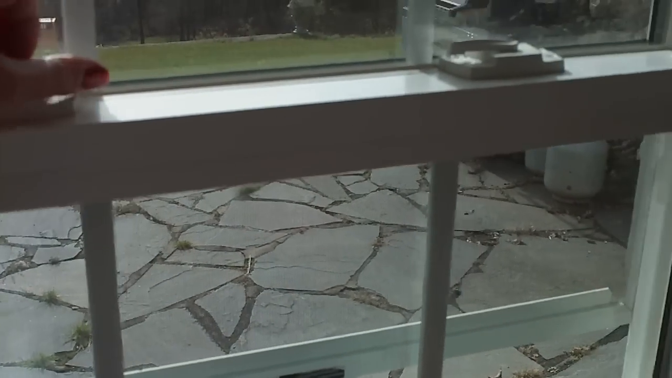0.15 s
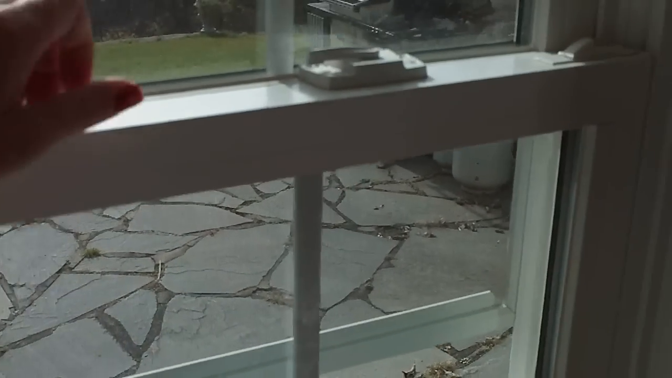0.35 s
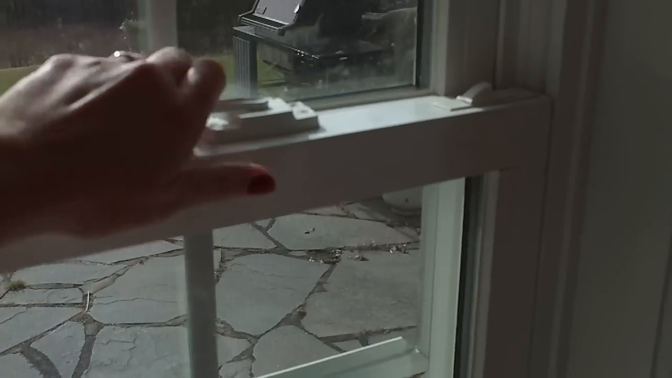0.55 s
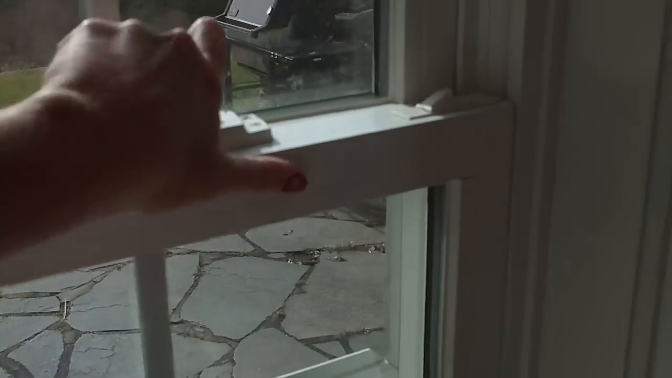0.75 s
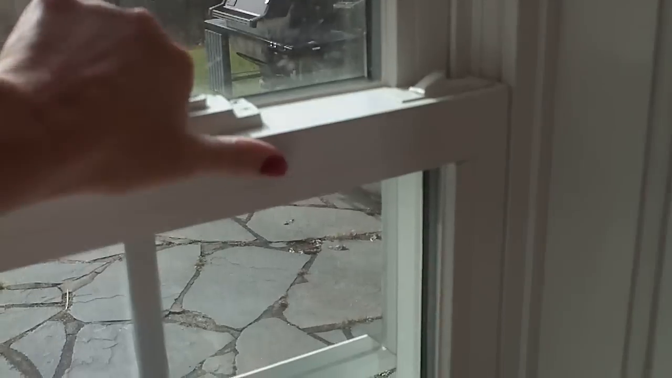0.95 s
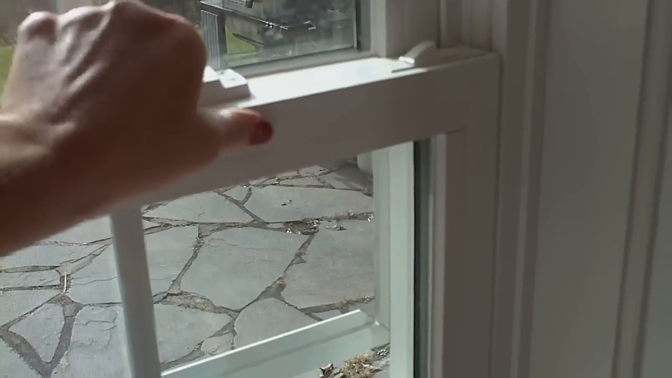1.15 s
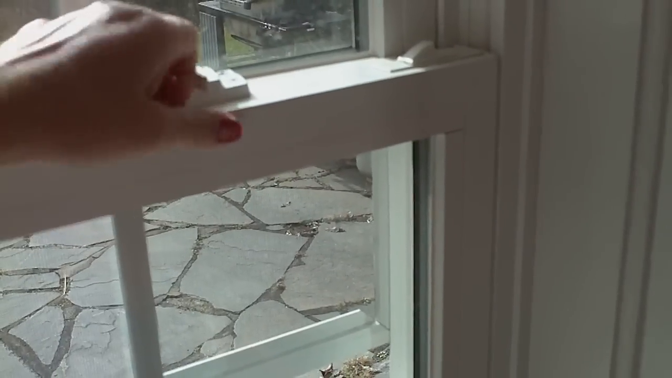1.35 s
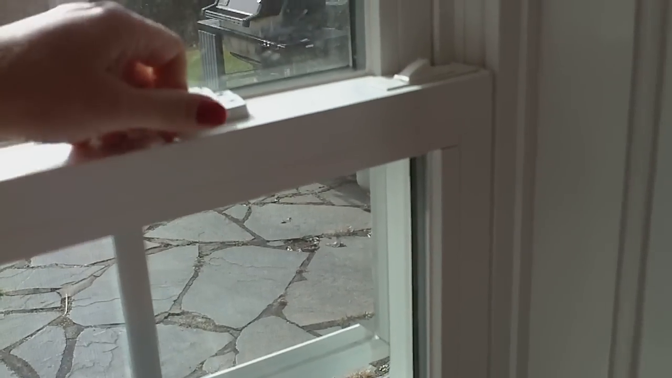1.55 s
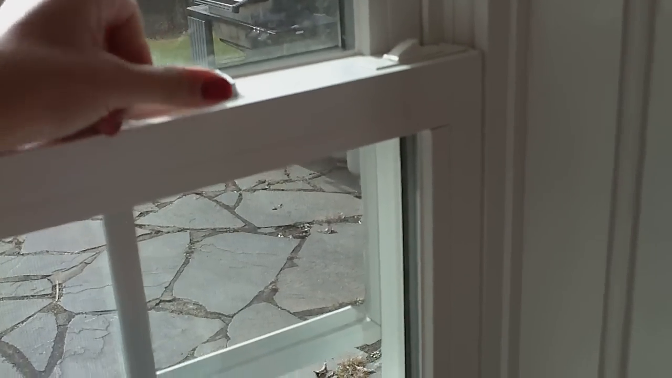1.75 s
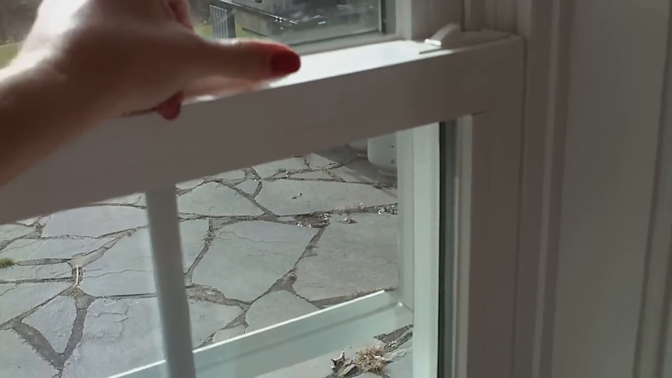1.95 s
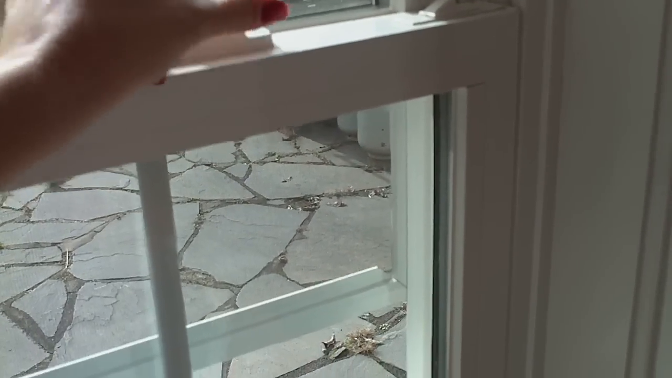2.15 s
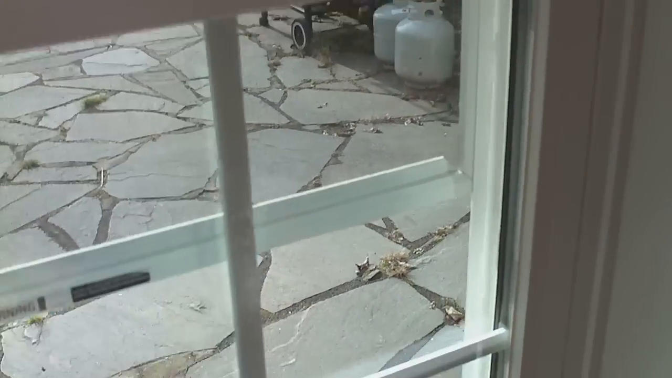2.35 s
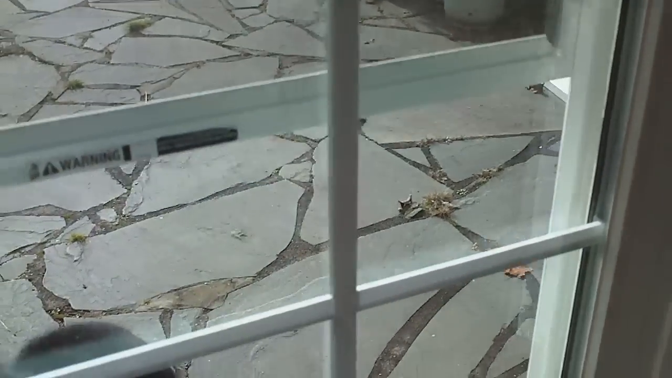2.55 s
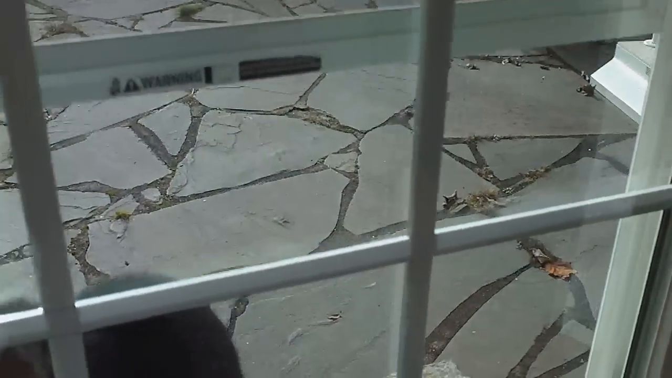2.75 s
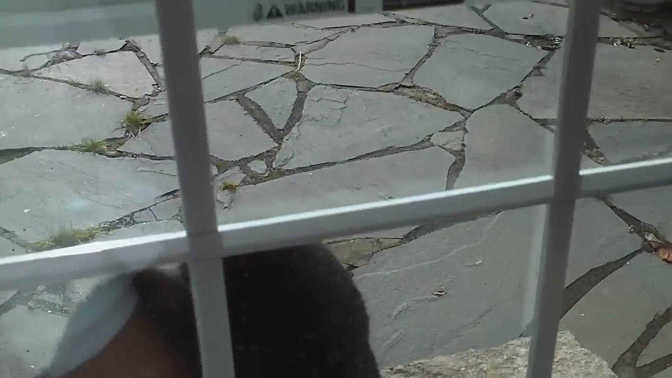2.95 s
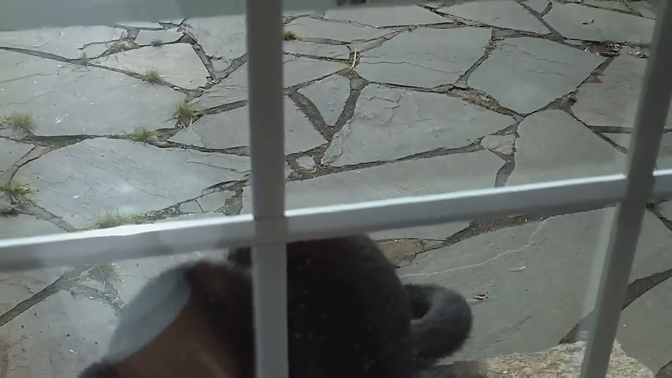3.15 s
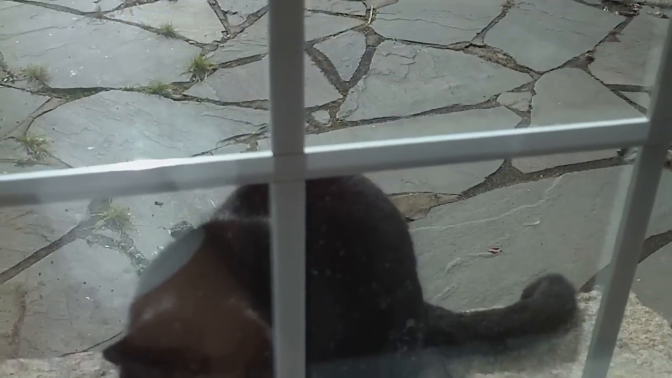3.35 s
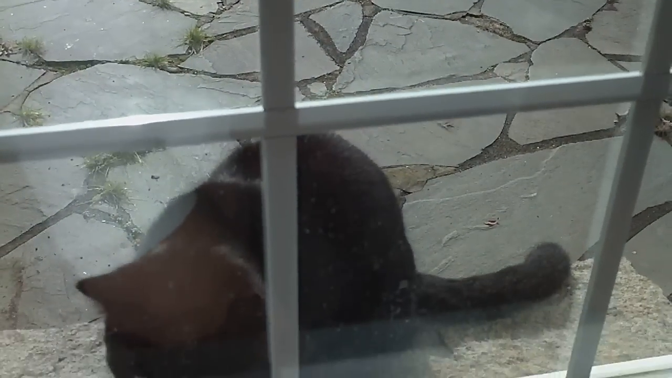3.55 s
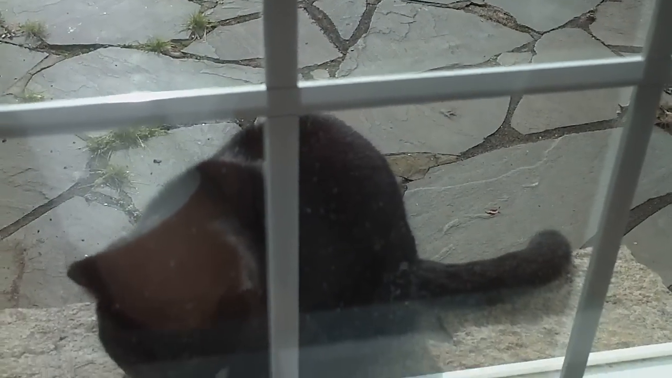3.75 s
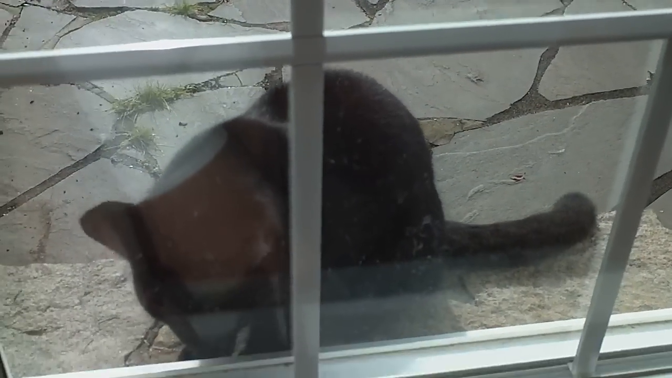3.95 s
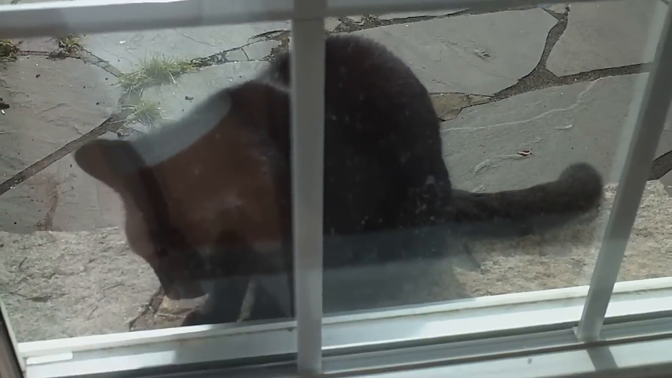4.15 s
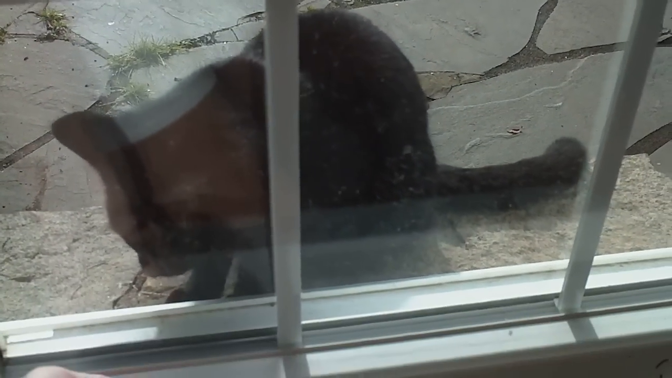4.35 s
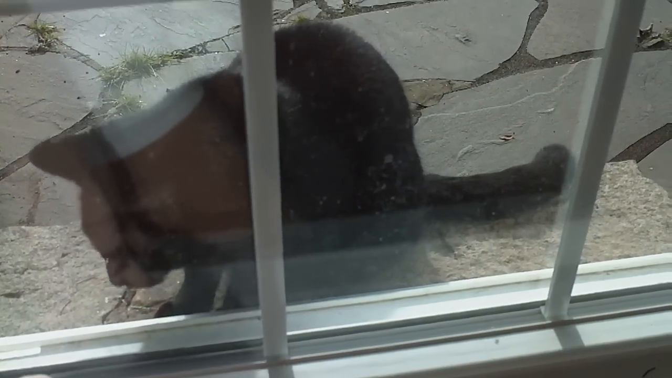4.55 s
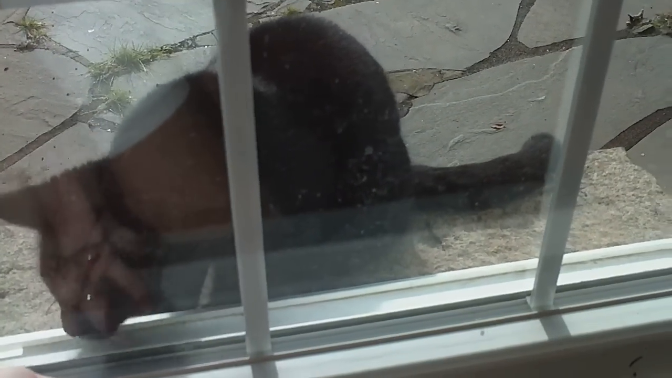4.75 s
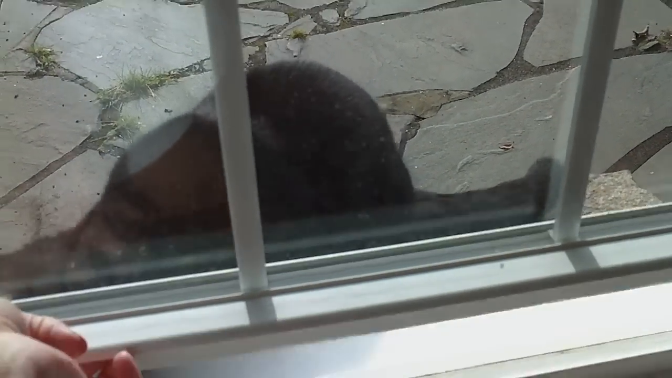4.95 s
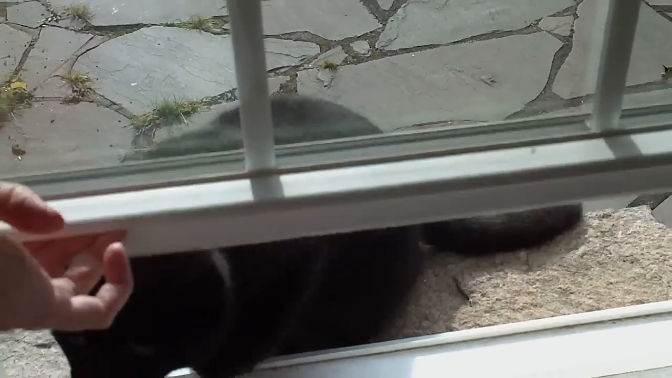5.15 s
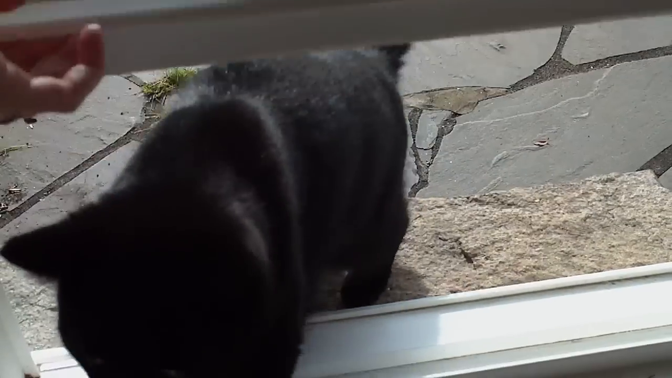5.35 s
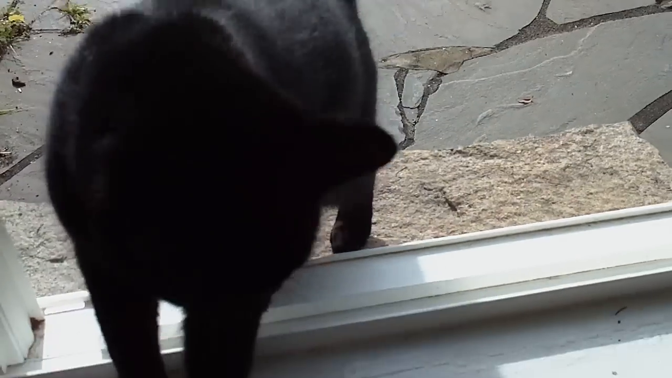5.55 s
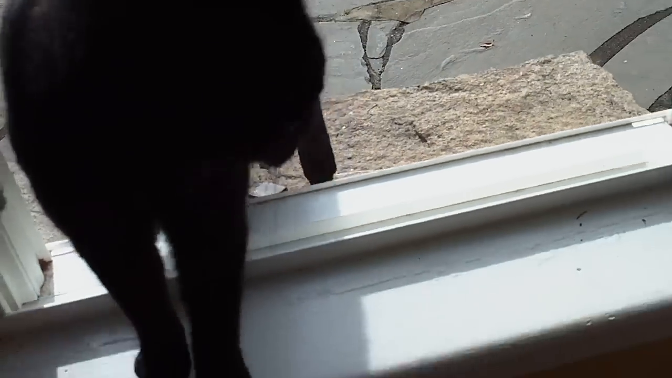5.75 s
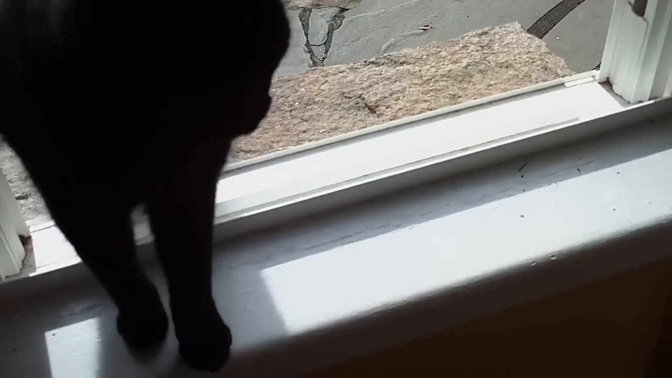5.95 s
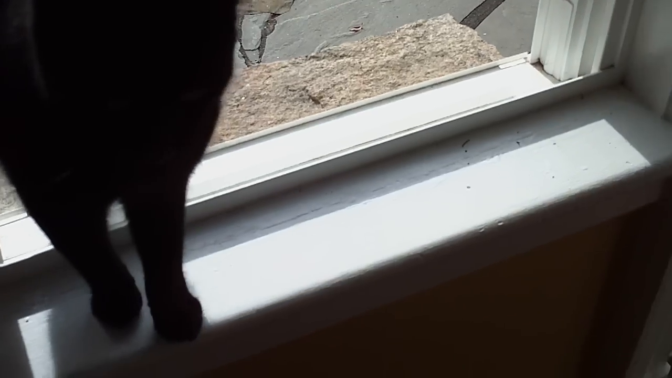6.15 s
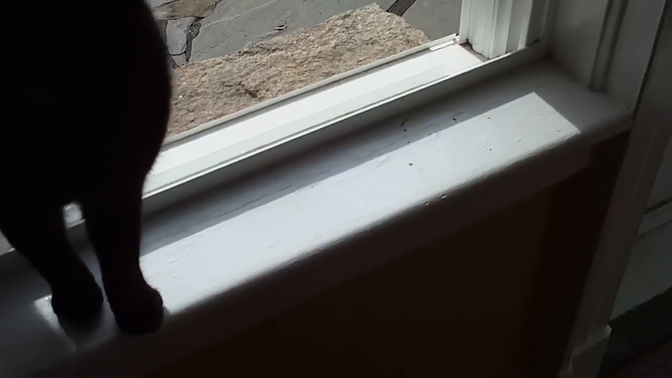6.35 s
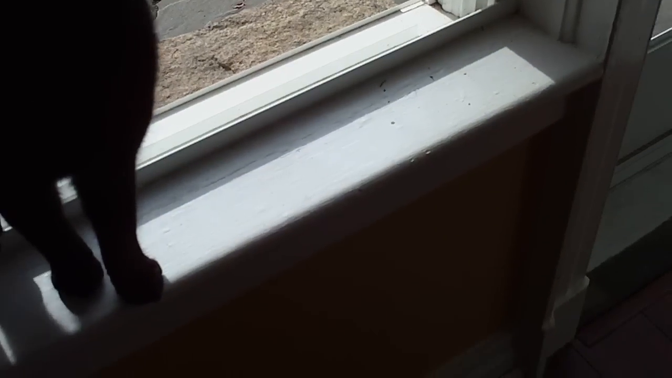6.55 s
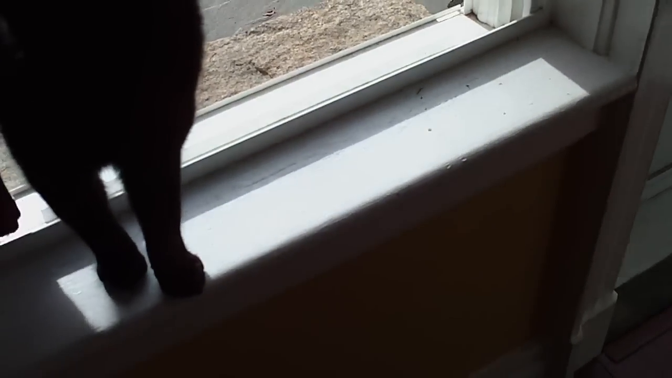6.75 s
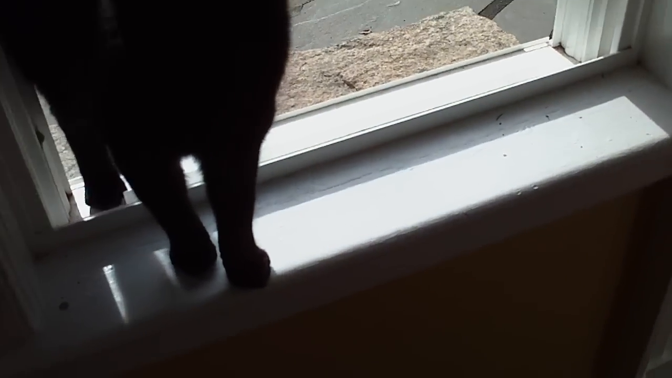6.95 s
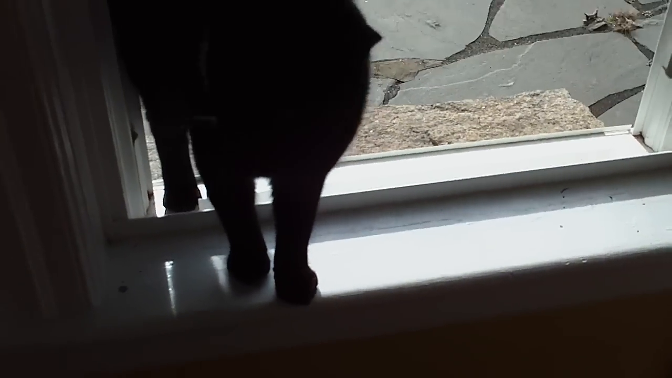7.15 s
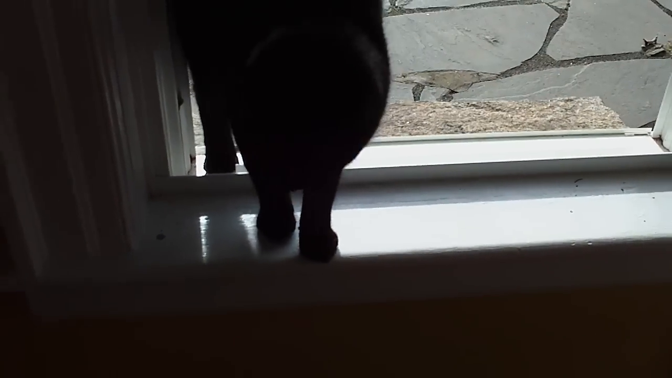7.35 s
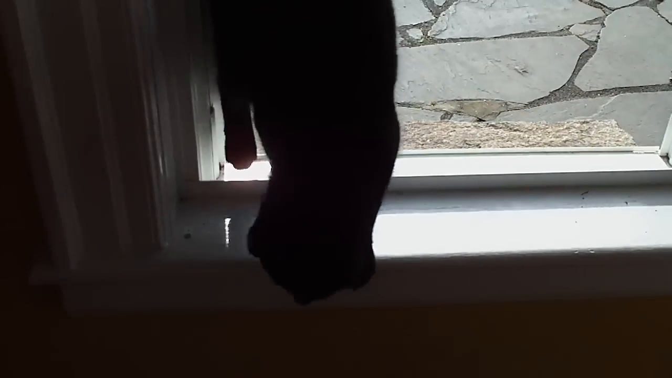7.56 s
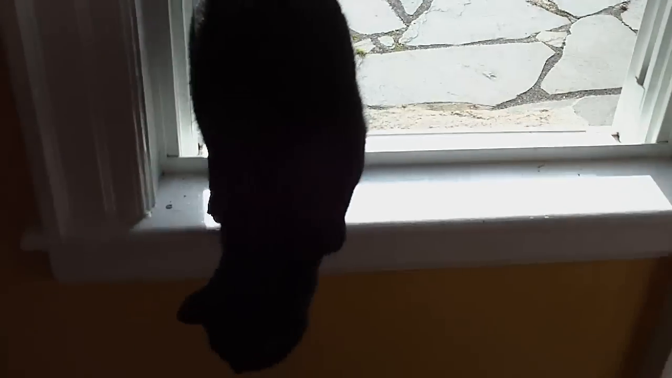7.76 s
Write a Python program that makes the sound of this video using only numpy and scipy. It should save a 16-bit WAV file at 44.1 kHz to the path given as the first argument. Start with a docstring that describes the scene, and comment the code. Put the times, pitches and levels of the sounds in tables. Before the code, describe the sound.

A window latch snaps sharply, the frame is knocked, then a stuck sash jerks free with loud cracks and slides up over a faint drone.

```python
"""In a small hard room, a hand snaps a window latch, bumps the frame, then jerks the stuck sash free and slides it up.
A cat brushes in over the sill. Blows are gritty bursts plus ringing modes; rubbing is a stream of tiny random slips.
The room echoes the hard blows and the rubbing, and pushes make the pane hum low. A far propeller drone, made of sine
partials, sinks slowly in pitch and comes in more clearly. A hissy microphone clips the peaks and cuts the top treble."""
import sys
import numpy as np
from scipy import signal
from scipy.fft import rfft, irfft
from scipy.io import wavfile
from scipy.ndimage import uniform_filter1d

SR = 44100
rng = np.random.default_rng(int(sys.argv[2]) if len(sys.argv) > 2 else 0)


def output_pcm(signal):
    """Save a mono or channel-first signal as 16-bit PCM at the path in sys.argv[1].

    Samples are clipped to [-1, 1] before scaling.
    """
    pcm = np.clip(np.atleast_2d(signal).T, -1, 1) * 32767
    wavfile.write(sys.argv[1], SR, np.round(pcm).astype(np.int16))


N = 343980
T = np.arange(N) / SR  # time in the scene, s
ONE_SECOND = np.arange(SR) / SR  # time within one ring or echo, s


def undb(db):
    """Turn decibels into a gain."""
    return 10 ** (np.asarray(db) / 20)


def unit(x):
    """Scale a sound to an rms of 1."""
    return x / np.sqrt(np.mean(x ** 2))


def level_curve(table):
    """Join (start_s, level_db) points by straight lines and return the gain over time."""
    start_s, level_db = np.transpose(table)
    return undb(np.interp(T, start_s, level_db))


def add(out, start_s, sound):
    """Mix a sound in at its start time."""
    start = max(int(start_s * SR), 0)
    out[start:start + len(sound)] += sound[:N - start]


def at_hz(points, hz):
    """Read (pitch_hz, value) points at any pitch, on a log-frequency axis."""
    knots, values = np.transpose(points)
    return np.interp(np.log(hz), np.log(knots), values)


def colour(x, points):
    """Shape the spectrum by (pitch_hz, level_db) points, then scale to an rms of 1."""
    hz = np.maximum(np.fft.rfftfreq(len(x), 1 / SR), 1)
    return unit(irfft(rfft(x) * undb(at_hz(points, hz)), len(x)))


def walk(rate):
    """Smooth random drift with an rms of 1, taking a new direction rate times a second."""
    step = int(SR / rate)
    stairs = np.repeat(rng.standard_normal(N // step + 1), step)
    return unit(uniform_filter1d(stairs, step)[:N])


def dying(t60):
    """Exponential fade that drops by 60 dB in t60 seconds."""
    return np.exp(-np.log(1000) * ONE_SECOND / t60)


# Echoes of the room, band by band: (pitch_hz, t60_s to fade by 60 dB, level_db of the echo)
ROOM = [(80, 0.46, -3.5), (200, 0.43, -6.5), (450, 0.4, -0.5), (1000, 0.56, -2), (2000, 0.52, -4.5),
        (3600, 0.56, -4.5), (5700, 0.48, -3), (7170, 0.22, -13.5)]


def room(x, gap_s=0.0024, fill_s=0.03, first_density=0.039):
    """A few early reflections thicken into a diffuse tail that dies at its own rate in each band."""
    density = first_density + (1 - first_density) * (1 - np.exp(-(ONE_SECOND / fill_s) ** 2))
    reflections = rng.standard_normal(SR) * (rng.random(SR) < density) / np.sqrt(density)
    echoes = rfft(reflections)
    log_hz = np.log(np.maximum(np.arange(len(echoes)), 1))  # one second long, so the bins are 1 Hz apart
    log_centres = np.log(np.array(ROOM)[:, 0])
    onset = 1 - np.exp(-(ONE_SECOND / gap_s) ** 2)
    response = np.zeros(SR)
    for share, (_, t60, level_db) in zip(np.eye(len(ROOM)), ROOM):
        fade = onset * dying(t60)
        band = irfft(echoes * np.interp(log_hz, log_centres, share), SR)
        response += undb(level_db) * band * fade / np.linalg.norm(fade)
    return signal.fftconvolve(x, response)[:N]


def ring(hz, t60, rise_ms):
    """One mode builds up, then dies away; no two blows tune it quite alike."""
    turns = hz * (1 + 0.0032 * rng.standard_normal()) * ONE_SECOND + rng.random()
    build_up = 1 - np.exp(-ONE_SECOND * 1000 / rise_ms)
    return build_up * dying(t60) * np.sin(2 * np.pi * turns)


def body(modes, hz, width, lift_db):
    """A struck part radiates best around its modes; the gain has an rms of 1 from 300 to 2500 Hz."""
    ridges = np.ones(len(hz))
    for mode_hz, level_db, _ in modes:
        ridges += undb(level_db + lift_db) / (1 + ((hz / mode_hz - 1) / width) ** 2)
    middle = (hz > 300) & (hz < 2500)
    return ridges / np.sqrt(np.mean(ridges[middle] ** 2))


# How much of a blow's extra thud reaches each pitch: (pitch_hz, share from 0 to 1)
THUD_SHARE = [(130, 1), (430, 0.2644), (1000, 0)]
# How much of a blow's extra brightness reaches each pitch: (pitch_hz, share from 0 to 1)
BRIGHT_SHARE = [(1000, 0), (1900, 0.49), (3400, 1), (5700, 0.72)]


def blows(table, modes, tone, ring_db, crack_db, grit, lift_db, width=0.058, even=0.66, top_db=-7):
    """Each blow is a brief gritty chatter of contact that echoes, and the ring of the part that was struck."""
    cracks, rings = np.zeros(N), np.zeros(N)
    size, grain = 4096, 32  # samples
    ms = ONE_SECOND[:size] * 1000
    f = np.maximum(np.fft.rfftfreq(size, 1 / SR), 1)
    slope_db = np.interp(f, [0, 90, 6000, 7300], [-20, 0, 2.5, top_db])
    radiated = body(modes, f, width, lift_db) * undb(crack_db + slope_db)
    for start_s, contact_ms, level_db, thud_db, bright_db in table:
        def gain(hz):
            """Strength of this blow at a pitch: weight lifts the bass, a hard contact the treble."""
            thud = thud_db * at_hz(THUD_SHARE, hz)
            bright = bright_db * at_hz(BRIGHT_SHARE, hz)
            return undb(level_db + at_hz(tone, hz) + thud + bright)

        age = ms / contact_ms
        push = age * np.exp(-age)  # strongest at contact_ms
        grains = np.repeat(np.exp(grit * rng.standard_normal(size // grain)), grain)
        force = rfft(push * grains * rng.standard_normal(size))
        force /= np.abs(force) ** min(even, 1)  # hard contact spreads its energy more evenly
        force /= np.sqrt(np.mean(np.abs(force) ** 2))
        add(cracks, start_s, irfft(force * gain(f) * radiated)[:size // 2])
        for hz, mode_db, t60 in modes:
            add(rings, start_s, gain(hz) * undb(mode_db + ring_db) * ring(hz, t60, 2 * contact_ms))
    return cracks + room(cracks) + rings


# Tone of the microphone hiss and quiet room: (pitch_hz, level_db)
FLOOR_COLOUR = [(60, 0), (150, -1), (280, 3), (450, 3.5), (700, -2), (1000, -3), (1500, -4.5), (2400, -6),
                (3200, -6.5), (4400, -7), (5700, -6.5), (6600, -9), (7400, -22)]
# Its level as the window opens: (start_s, level_db)
FLOOR_LEVEL = [(0, -49.5), (2.5, -49.5), (4.4, -50.5), (5.8, -47), (6.6, -49.5), (7.8, -48.5)]
# Tone of the low house rumble: (pitch_hz, level_db)
RUMBLE_COLOUR = [(15, 4), (32, 3.5), (55, -11), (100, 1.5), (200, -19.5), (400, -55)]


def floor(rumble_db=-58):
    """Nearly even microphone hiss lies over a faint, restless house rumble; both are shaped noise."""
    hiss = colour(rng.standard_normal(N), FLOOR_COLOUR)
    hiss *= level_curve(FLOOR_LEVEL) * undb(0.6 * walk(7.2))
    rumble = colour(rng.standard_normal(N), RUMBLE_COLOUR)
    rumble *= undb(rumble_db + 1.2 * walk(4.9))
    return hiss + rumble


# Overall level of the drone as it nears and the window opens: (start_s, level_db)
DRONE_LEVEL = [(0.5, -66), (1.6, -61), (2.6, -52), (3.8, -55), (4.4, -51.5), (6.5, -50), (7.7, -49)]
# Partials: (multiple of the blade rate, level_db, loudest_s, half_width_s of the swell, swell_db)
DRONE_PARTIALS = [(1, 2.5, 5.18, 0.66, 7), (1.5, -18, 6.7, 3.4, 9), (2, -8, 5.9, 0.89, 11.5),
                  (3, -7, 6.55, 0.4, 5), (4, -18.5, 6.5, 1.13, 17)]
DRONE_HZ, DRONE_SAG_HZ_PER_S = 99.6, 1.78  # blade rate at the start, and how fast it sinks


def drone(waver_db=0.46, wobble=0.0023):
    """A far propeller: blade harmonics and a weaker shaft line, each swelling once through the air."""
    hz = (DRONE_HZ - DRONE_SAG_HZ_PER_S * T) * (1 + wobble * walk(4.84))
    phase = 2 * np.pi * np.cumsum(hz) / SR
    out = np.zeros(N)
    for multiple, level_db, loudest_s, half_width_s, swell_db in DRONE_PARTIALS:
        swell = swell_db * np.exp(-((T - loudest_s) / half_width_s) ** 2)
        tone = np.sin(multiple * phase + 2 * np.pi * rng.random())
        out += undb(level_db + swell + waver_db * walk(6)) * tone
    return np.sqrt(2) * level_curve(DRONE_LEVEL) * out


# Pushes that flex the window pane: (start_s, level_db)
PANE_PUSHES = [(0.0, -20), (0.65, -48), (1.05, -34), (1.58, -34), (2.04, -20.5), (2.53, -45), (4.14, -40),
               (4.536, -25.5), (4.9, -24.5), (4.96, -23.5)]
PANE_HZ = 33.2


def pane(t60=0.67, rise_s=0.012):
    """The glass flexes like a slow drumhead when pushed: a low sine that rises fast and dies away."""
    out = np.zeros(N)
    build_up = 1 - np.exp(-ONE_SECOND / rise_s)
    flex = build_up * dying(t60) * np.sin(2 * np.pi * PANE_HZ * ONE_SECOND)
    for start_s, level_db in PANE_PUSHES:
        add(out, start_s, undb(level_db) * flex)
    return out


# Knocks on the frame: (start_s, contact_ms, level_db, extra thud_db, extra brightness_db)
FRAME_KNOCKS = [(0.001, 4.1, -29.5, 15.5, 4), (1.156, 2.64, -16, 0, 4.5), (1.196, 2.4, -36.5, 9, -9),
                (1.844, 2.5, -48, 14, -1), (1.876, 2.7, -37, 3, -5.5), (1.931, 3.2, -26.5, -8, -6),
                (2.047, 1.96, -34.5, 20, 12), (2.054, 3.05, -27, 15.5, 15.5), (2.7, 4.2, -44, 3, -13),
                (3.0, 1.2, -54.5, -6, 1), (3.222, 6.2, -63, -2, 27), (3.53, 6.2, -35, -8, 0.5),
                (3.758, 1.8, -48, -14, -26), (3.811, 4.4, -46.5, -5, -5), (4.102, 6.2, -47, 8.5, -3),
                (4.139, 2.7, -40, -2.5, -11), (4.335, 3.5, -53.5, -1, -8)]
# What the frame rings with: (pitch_hz, level_db, t60_s)
FRAME_MODES = [(118, -3.5, .3), (150.8, -11.5, 0.99), (278, -8.5, 0.41), (337.7, 6, 0.42),
               (408.4, 7.5, 0.49), (462, 1, 0.47), (496, 5.5, 0.42), (768, 0.5, 0.3), (1002, 2, 0.29),
               (1110, -5, 0.24), (1440, -16.5, .3), (1437, 3, 0.26), (2410, -5, .3)]
# Usual tone of a blow on the frame: (pitch_hz, level_db)
FRAME_TONE = [(130, 1), (430, -5), (1000, 0), (1900, -7), (3400, -20), (5700, -15.5)]


def frame_knocks():
    """Knocks set the window frame cracking and ringing in its own modes."""
    return blows(FRAME_KNOCKS, FRAME_MODES, FRAME_TONE, ring_db=-9.5, crack_db=45.0, grit=0.24, lift_db=-5.5)


# Snaps and ticks of the latch: (start_s, contact_ms, level_db, extra thud_db, extra brightness_db)
LATCH_CLICKS = [(0.118, 2.2, -17.5, -10, 3), (0.1217, 1.26, -14.5, -14, -9), (0.531, 2.5, -56, -1, 2),
                (0.725, 3.8, -50.5, 6, -9), (0.972, 1.8, -49, -8, -18), (0.984, 5, -36, 7, -16),
                (1.008, 8, -51, 7, 6.5), (1.05, 2.6, -55, 15, 12)]
# What the latch rings with: (pitch_hz, level_db, t60_s)
LATCH_MODES = [(150, -2, 0.89), (473, 4, 0.53), (678, -2, 0.79), (880, -2, 0.7), (900, 0.5, 0.82),
               (950, -2, 0.43), (1015, -2.5, 0.35), (1540, 3.5, 0.4), (1736, -2, .4), (1800, 7, 0.37),
               (2187, 2.5, 0.4), (4340, -5, .3)]
# Usual tone of a blow on the latch: (pitch_hz, level_db)
LATCH_TONE = [(130, 0), (430, -0.5), (1000, 1.5), (1900, -2), (3400, -6), (5700, -8.5)]


def latch_clicks():
    """The latch snaps and ticks as its parts strike each other and ring."""
    return blows(LATCH_CLICKS, LATCH_MODES, LATCH_TONE, ring_db=-19.0, crack_db=42.5, grit=0.26, lift_db=-0.5)


# Soft finger bumps on the frame: (start_s, level_db, contact_ms)
FINGER_BUMPS = [(0.701, -43, 3.9), (0.853, -45, 8.9), (1.19, -27, 3.2), (1.53, -37, 4.3), (1.587, -48, 6),
                (3.533, -39.5, 5.8)]
# What the frame under a fingertip rings with: (pitch_hz, level_db, t60_s)
SOFT_MODES = [(131.5, -7, 0.3), (281, 2.5, 0.28), (346.3, -3, 0.28), (390, -2.5, 0.44), (460, -6.5, 0.5),
              (513, -6.5, 0.28), (830, -11, 0.14)]


def fingers():
    """Flesh is too soft to click: it only sets the low modes of the frame ringing."""
    out = np.zeros(N)
    for start_s, level_db, contact_ms in FINGER_BUMPS:
        for hz, mode_db, t60 in SOFT_MODES:
            add(out, start_s, undb(level_db + mode_db) * ring(hz, t60, contact_ms))
    return out


# Tone of the wooden rub: (pitch_hz, level_db)
RUB_COLOUR = [(60, -8.5), (150, 0.5), (300, 0), (500, -0.5), (680, -4.5), (960, 4.5), (1150, -3.5),
              (1450, -0.5), (2000, -9), (2430, -7.5), (3200, -21), (5000, -39)]
# Tone of the fine hiss that rides on it: (pitch_hz, level_db)
HISS_COLOUR = [(1200, -33.5), (2500, -10), (4000, -4), (5000, -1.5), (5800, 1.5), (6600, 0), (7400, -8.5)]


def rubbing(rub, hiss, slips_per_s, scatter_db, judder_db, swell_db):
    """Tiny slips of uneven size shake the wood, which catches and frees; fibres hiss along more evenly."""
    happens = rng.random(N) < slips_per_s / SR
    slips = happens * rng.standard_normal(N) * undb(scatter_db * rng.standard_normal(N))
    wood = unit(colour(slips, RUB_COLOUR) * undb(swell_db * walk(25)))
    fibres = colour(unit(slips) + rng.standard_normal(N), HISS_COLOUR)
    return undb(judder_db * walk(70)) * (rub * wood + hiss * fibres)


def stroke(start_s, length_s, attack_s, release_s):
    """Envelope of one movement: it sets in, holds and lets go."""
    sets_in = np.clip((T - start_s) / attack_s, 0, 1)
    lets_go = np.clip(1 - (T - start_s - length_s) / release_s, 0, 1)
    return sets_in * lets_go


# Short shoves that grind the stuck sash along its track:
# (start_s, length_s, level_db of the wood rub, level_db of the weatherstrip hiss)
SHOVES = [(3.6, 0.035, -64, -53), (4.128, 0.018, -50, -46), (4.488, 0.03, -36, -33),
          (4.514, 0.024, -28, -21.5), (4.531, 0.0083, -26.5, -12), (4.763, 0.032, -38.5, -44),
          (4.78, 0.0054, -36, -19.5), (4.8, 0.12, -47, -44), (4.872, 0.014, -23, -19),
          (4.9, 0.047, -23.5, -29), (4.932, 0.049, -20, -21), (4.98, 0.18, -32, -39)]
SHOVE_ATTACK_S, SHOVE_RELEASE_S = 0.0072, 0.011
# The long slide once it is free: the wood rubs less and less, the weatherstrip hisses on
SLIDE_START_S, SLIDE_LENGTH_S, SLIDE_ATTACK_S, SLIDE_RELEASE_S = 4.933, 0.73, 0.08, 0.19
SLIDE_RUB_DB, SLIDE_EASE_DB_PER_S, SLIDE_HISS_DB = -37, -4, -40


def sash_slide():
    """The sash grinds forward in short shoves and runs up its track in one long, easing stroke."""
    run = stroke(SLIDE_START_S, SLIDE_LENGTH_S, SLIDE_ATTACK_S, SLIDE_RELEASE_S)
    rub = run * undb(SLIDE_RUB_DB + SLIDE_EASE_DB_PER_S * (T - SLIDE_START_S))
    hiss = run * undb(SLIDE_HISS_DB)
    for start_s, length_s, rub_db, hiss_db in SHOVES:
        shove = stroke(start_s, length_s, SHOVE_ATTACK_S, SHOVE_RELEASE_S)
        rub = np.maximum(rub, shove * undb(rub_db))  # the stronger movement wins
        hiss = np.maximum(hiss, shove * undb(hiss_db))
    return rubbing(rub, hiss, slips_per_s=1800, scatter_db=0.0, judder_db=1.97, swell_db=2.2)


# Jolts of the sash in its track: (start_s, contact_ms, level_db, extra thud_db, extra brightness_db)
SASH_JOLTS = [(4.493, 2, -40, 9, -4), (4.522, 3, -27, -1, -10.5), (4.538, 0.59, -32.5, 6.5, 7),
              (4.784, 0.84, -37.5, 0, -3), (4.803, 3, -38, 4, 3), (4.864, 0.72, -39.5, -13, 8),
              (4.88, 5.9, -12.5, -4, 1), (4.939, 2.5, -29.5, 7, 6), (4.953, 6.4, -12, -3.5, -1.5),
              (4.993, 11, -31.5, -4, -11), (5.398, 3.5, -37, 1, -7), (5.558, 4.3, -33.5, -3, -18)]
# What the sash rings with: (pitch_hz, level_db, t60_s)
SASH_MODES = [(92.2, 8, 0.54), (196.4, 9.5, 0.22), (409, -8, 0.31), (513, 10, 0.29), (620, -4, 0.2),
              (810, -5, 0.61), (905, -3, 0.39), (1008, -3, 0.28), (1106, 1, 0.3), (1150, -0.5, 0.51),
              (1380, -1.5, 1), (1450, 0, 0.4), (1720, -5, 0.3), (1830, 0.5, 0.55), (2440, -9, 0.97),
              (5680, 0, .3)]
# Usual tone of a blow on the sash: (pitch_hz, level_db)
SASH_TONE = [(130, 0), (430, 3), (1000, 2), (1900, -3), (3400, -4.5), (5700, -5.5)]


def sash_jolts():
    """The sash jolts in its track, with a gritty crack and the ring of its modes."""
    return blows(SASH_JOLTS, SASH_MODES, SASH_TONE, ring_db=-18.0, crack_db=40.0, grit=0.37, lift_db=-8.5)


# Fur brushing the sill and the jamb: (start_s, length_s, level_db of the rub, level_db of the hiss)
FUR_BRUSHES = [(5.879, 0.089, -40, -46), (6.082, 0.42, -50, -54), (6.57, 0.15, -55, -57),
               (6.73, 0.13, -58, -53.5), (6.97, 0.22, -51, -66), (7.15, 0.23, -49.5, -55),
               (7.259, 0.2, -51.5, -42)]


def fur():
    """Each brush of the cat's coat swells and fades in one smooth arch of many tiny slips."""
    rub, hiss = np.zeros(N), np.zeros(N)
    for start_s, length_s, rub_db, hiss_db in FUR_BRUSHES:
        arch = np.sin(np.pi * np.clip((T - start_s) / length_s, 0, 1)) ** 2
        rub += arch * undb(rub_db)
        hiss += arch * undb(hiss_db)
    return rubbing(rub, hiss, slips_per_s=7200, scatter_db=3.5, judder_db=2.2, swell_db=3.0)


# Paws on the sill: (start_s, contact_ms, level_db, extra thud_db, extra brightness_db)
PAW_TAPS = [(6.259, 3, -29, -4, 0.5), (6.395, 1.8, -52.5, 24, 2), (7.005, 7.1, -49.5, -8, -21)]
# What the sill under a paw rings with: (pitch_hz, level_db, t60_s)
SILL_MODES = [(325, 1, 0.46), (547, -10, .2), (992, 2, 0.36), (1435, -5, 0.26), (2340, -5.5, .25),
              (2300, -2, 0.32)]
# Usual tone of a blow on the sill: (pitch_hz, level_db)
SILL_TONE = [(130, 3), (430, 1), (1000, -1), (1900, -4.5), (3400, -14.5), (5700, -7.5)]


def paw_taps():
    """The cat's paws tap the sill and set its modes ringing."""
    return blows(PAW_TAPS, SILL_MODES, SILL_TONE, ring_db=-11, crack_db=44.0, grit=0.18, lift_db=10.0)


def scene():
    """Window and cat sound in front; the drone and the hiss lie underneath."""
    hits = frame_knocks() + latch_clicks() + sash_jolts() + paw_taps()
    rubs = sash_slide() + fur()
    background = floor() + drone()
    mix = background + pane() + hits + fingers() + rubs + room(rubs)
    return mix[None]


TOP_HZ = 7250


def record(dry):
    """The microphone path clips the highest peaks, then a steep low-pass cuts what lies above TOP_HZ."""
    low_pass = signal.ellip(10, 0.2, 70, TOP_HZ, fs=SR, output="sos")
    return signal.sosfilt(low_pass, np.clip(dry, -0.92, 0.92))


dry = scene()
out = record(dry)
output_pcm(out)
```